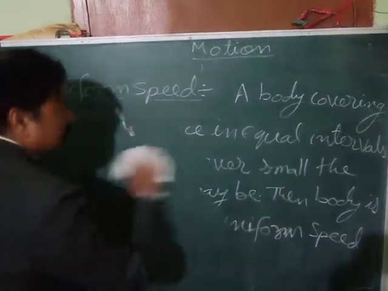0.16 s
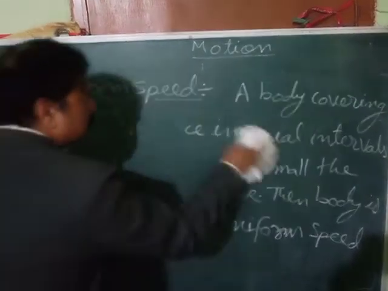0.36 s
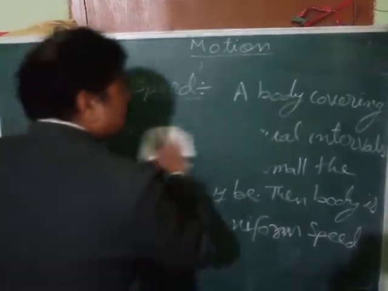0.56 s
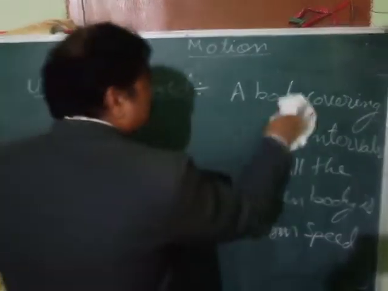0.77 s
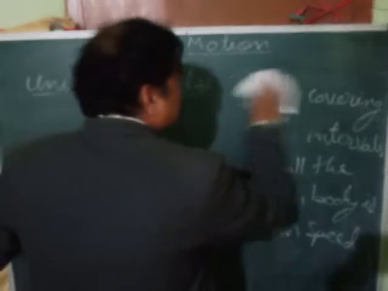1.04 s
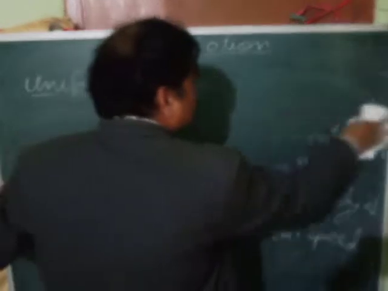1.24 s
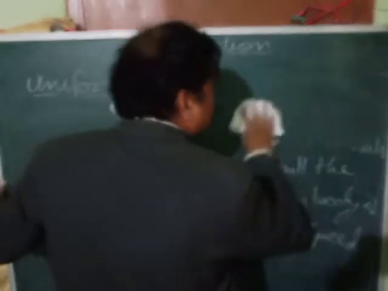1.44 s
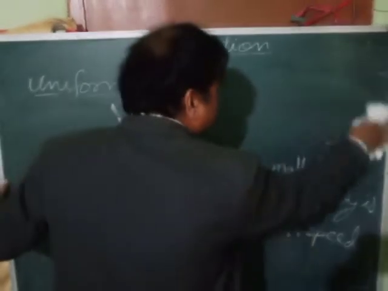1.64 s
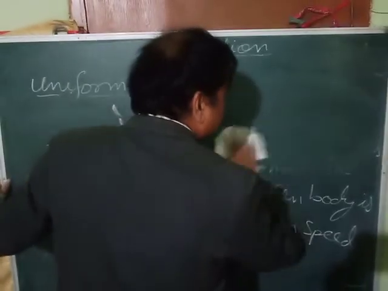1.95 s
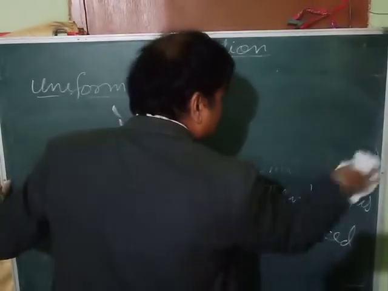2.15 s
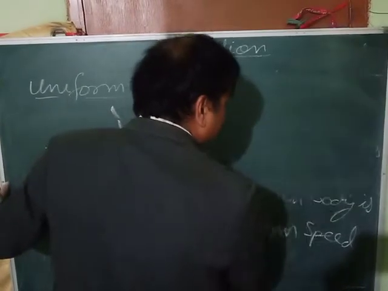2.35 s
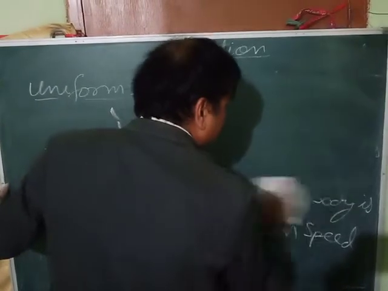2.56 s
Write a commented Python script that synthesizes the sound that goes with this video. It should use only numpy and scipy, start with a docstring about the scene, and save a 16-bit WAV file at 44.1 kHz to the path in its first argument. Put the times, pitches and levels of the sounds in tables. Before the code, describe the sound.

A cloth hisses over a chalkboard in quick alternating strokes from start to end, while the loose board knocks and rattles softly against the wall, strongest near one and two seconds; small quiet room, close microphone, nearly mono.

```python
"""A cloth hisses across a blackboard in quick back-and-forth strokes, wiping off chalk in a small classroom.
Fibres catch and slip: random clicks, coloured as hiss, fizz and rasp, grow with hand speed.
As the hand pushes off, the loose board often knocks on the wall, ringing its modes, and chatters briefly.
Low booms of the panel, scuffs of the bunched cloth, frame clatter, a short room tail and faint still air
fill in the rest. The sound is close to mono."""
import sys
import numpy as np
from scipy import signal
from scipy.fft import rfft, irfft
from scipy.io import wavfile
from scipy.ndimage import uniform_filter1d

SR = 44100
rng = np.random.default_rng(int(sys.argv[2]) if len(sys.argv) > 2 else 0)


def generate_wav(signal):
    """Clip the signal to [-1, 1] and save it as 16-bit WAV at the path in sys.argv[1]."""
    frames = np.transpose(np.atleast_2d(signal))
    scaled = np.clip(frames, -1, 1) * 32767
    pcm = np.round(scaled).astype(np.int16)
    wavfile.write(sys.argv[1], SR, pcm)


N = 119070

# fine treble of the rubbing cloth: freq_hz, gain_db
FIZZ_CURVE = [(7000, -51), (10000, 11), (12000, 5.5), (14000, 8.5), (15500, 3)]
# knocks of the board: start_s, level_db, contact_ms, chatter_db
BOARD_KNOCKS = [(0.255, -6.5, 3.06, -3), (0.358, -13.5, 5.1, -12), (0.574, -2.5, 1.64, -11),
                (0.963, -0.5, 0.95, -3), (1.164, -15, 4.9, -16.5), (1.930, 1, 1.0, -12.5),
                (2.305, -28.5, 2.6, 15), (2.402, 4, 0.78, -15)]


def undb(db):
    """Decibels to gain."""
    return 10 ** (np.asarray(db) / 20)


def unit(x):
    """Scale to an rms of 1."""
    return x / np.sqrt(np.mean(x ** 2))


def colour(x, points):
    """Filter by a (Hz, dB) curve, linear over log frequency; rms 1."""
    hz, db = np.array(points, float).T
    freq_hz = np.maximum(np.fft.rfftfreq(N, 1 / SR), 1)
    gain_db = np.interp(np.log(freq_hz), np.log(hz), db)
    return unit(irfft(rfft(x) * undb(gain_db), N))


def walk(rate_hz):
    """Slow random drift: held random steps, smoothed over one step; rms 1."""
    step = max(int(SR / rate_hz), 1)
    held = np.repeat(rng.standard_normal(N // step + 1), step)
    return unit(uniform_filter1d(held, step)[:N])


def catches():
    """Dense tiny clicks of fibres that catch and let go."""
    clicks_per_s, spread_db = 22000, -0.4
    hit = rng.random(N) < clicks_per_s / SR
    strength_db = spread_db * np.minimum(rng.exponential(size=N), 5)
    return hit * rng.standard_normal(N) * undb(strength_db)


def still_air():
    """Steady coloured noise of the quiet room."""
    level_db = -75.5
    # freq_hz, gain_db
    air_curve = [(25, -14), (45, -8.5), (75, -1), (120, 4.5), (200, -8), (400, -13), (1000, -11.5),
                 (4000, -30), (15000, -16.5)]
    return undb(level_db) * colour(rng.standard_normal(N), air_curve)


def side_noise():
    """Barely audible noise, opposite in left and right."""
    level_db = -81.5
    # freq_hz, gain_db
    noise_curve = [(25, -1), (120, 1.5), (300, 0.5), (1000, -1.5), (2500, -11), (5000, -27), (9000, -20.5),
                   (14000, -2.5)]
    return undb(level_db) * colour(rng.standard_normal(N), noise_curve)


def near_echo(rub, place, t):
    """One bounce off the arm and body; its lag follows the hand."""
    centre_ms, swing_ms, echo_db = 1.9, 1.16, -14
    lag_s = (centre_ms + swing_ms * (place - .5)) / 1000
    echo = undb(echo_db) * np.interp(t - lag_s, t, rub)
    return (rub + echo) / np.hypot(1, undb(echo_db))


def wiping(t):
    """Strokes speed up and slow down; rasp sounds even when slow, hiss and fine fizz when fast."""
    # strokes, right and left in turn: start_s, rise_s, fall_s, level_db, fizz_db, rasp_db
    strokes = [(-.12, 0.041, 0.12, -40.5, -9, 1.5), (0.038, 0.14, 0.12, -40, 0, -2.5),
               (.305, 0.1, 0.098, -40, -4, -4), (.515, 0.078, 0.15, -40, 1.5, 0),
               (.745, 0.073, 0.083, -45, -5, 5), (.92, 0.073, 0.22, -41.5, 0.5, 1.5),
               (1.215, 0.12, 0.079, -41, -1, 1.5), (1.409, 0.064, .165, -41.5, 0, 0),
               (1.67, 0.12, 0.13, -40, 0.5, 1.5), (1.905, 0.074, 0.16, -40, 1.5, -2),
               (2.123, 0.15, 0.11, -37, 1.5, -5.5), (2.376, 0.13, 0.18, -39, 1, -1.5)]
    # thinnings of the rasp: centre_s, half_width_s, gain_db
    rasp_dips = [(.912, .02, -12), (1.215, 0.092, -7), (1.655, 0.037, -16), (1.905, 0.022, -5)]
    # colours of the rub: freq_hz, gain_db
    hiss_curve = [(2000, -59), (2700, -21.5), (3400, -12), (4000, -5), (4500, -2.5), (5100, -6),
                  (5800, -6.5), (6800, 0.5), (7500, -4), (8500, -10), (9800, -10.5), (11200, -28.5),
                  (15500, -38)]
    rasp_curve = [(300, -35), (700, -26), (1450, -17), (1800, -6.5), (2600, 2.5), (3400, 0.5), (5000, -12)]
    hiss_power, fizz_power, rasp_power = 1.22, 1.6, 0.29  # growth with hand speed
    hiss_db, fizz_layer_db, rasp_layer_db = -0.5, -12, -13
    drag_db = -56.5  # the cloth never quite stops as the hand turns
    rasp_wobble_db, rasp_rate_hz = 2.06, 31
    grip_db, grip_rate_hz = .5, 110

    hiss, fizz, rasp, place = np.zeros((4, N))
    for k, (start, rise, fall, db, fizz_db, rasp_db) in enumerate(strokes):
        ramp = np.interp(t, [start, start + rise, start + rise + fall], [0, 1, 0])
        speed = np.sin(np.pi / 2 * ramp)
        hiss += undb(db) * speed ** hiss_power
        fizz += undb(db + fizz_db) * speed ** fizz_power
        rasp += undb(db + rasp_db) * speed ** rasp_power
        place += (-1) ** k * np.cumsum(speed) / (speed.sum() + 1e-9)  # 0 to 1 across the board
    rasp *= undb(sum(db * np.exp(-((t - at) / width) ** 2) for at, width, db in rasp_dips))

    rub = np.hypot(undb(hiss_db) * hiss, undb(drag_db)) * colour(catches(), hiss_curve)
    rub += undb(fizz_layer_db) * fizz * colour(catches(), FIZZ_CURVE)
    rasp_gain = undb(rasp_layer_db + rasp_wobble_db * walk(rasp_rate_hz))
    rub += rasp_gain * rasp * colour(catches(), rasp_curve)
    rub *= undb(grip_db * walk(grip_rate_hz))
    return near_echo(rub, place, t)


def booms(t):
    """A low note of the panel swells, sags in pitch and dies under the hand."""
    # sways of the panel: start_s, length_s, mid_pitch_hz, level_db
    sways = [(.0, .15, 126.4, -69.5), (.66, 0.12, 136, -64), (1.048, 0.056, 118, -54.5),
             (1.955, 0.054, 127, -56), (2.607, 0.098, 143, -47)]
    sag_hz_per_s = 220
    wobble_db, wobble_rate_hz = 4, 77  # wobble depth before smoothing
    out = np.zeros(N)
    for start, length, hz, db in sways:
        from_peak = t - start - length / 2
        cycles = hz * from_peak - sag_hz_per_s * from_peak ** 2 / 2
        swell = np.sin(np.pi * np.clip((t - start) / length, 0, 1))
        out += undb(db) * swell * np.sin(2 * np.pi * cycles)
    return out * undb(wobble_db * uniform_filter1d(walk(wobble_rate_hz), SR // 100))


def scuffs(t):
    """Short uneven rubs as the cloth bunches: a dull body and a crisp rustle."""
    # start_s, rise_s, decay_s, dull_db, crisp_db
    rubs = [(.255, .025, .035, -60, -78), (1.573, .006, .075, -55.5, -57), (1.724, .005, .025, -55, -68),
            (2.63, .03, .05, -64, -72)]
    # colour of the dull body: freq_hz, gain_db
    dull_curve = [(250, -16), (420, -2), (560, -16), (740, 3.5), (1020, 0.5), (1250, -3), (1750, 6.5),
                  (2300, -1.5), (3200, -20), (6800, -5.5), (9000, -28)]
    wobble_db, wobble_rate_hz = 0.6, 100
    dull, crisp = colour(catches(), dull_curve), colour(catches(), FIZZ_CURVE)
    out = np.zeros(N)
    for start, rise, decay, dull_db, crisp_db in rubs:
        attack = np.clip((t - start) / rise, 0, 1)
        release = np.exp(-np.maximum(t - start - rise, 0) / decay)
        out += attack * release * (undb(dull_db) * dull + undb(crisp_db) * crisp)
    return out * undb(wobble_db * walk(wobble_rate_hz))


def board_ring(age, modes):
    """Decaying modes of the board, a little different in level and pitch at each knock."""
    spread_db, detune, build_cycles = 1.03, 0.012, 0.84
    ring = np.zeros(len(age))
    for hz, mode_db, t60 in modes:
        level_draw, pitch_draw = rng.standard_normal(2)
        tone = np.sin(2 * np.pi * hz * (1 + detune * pitch_draw) * age)
        decay = np.exp(-np.log(1000) * age / t60)
        build = 1 - np.exp(-age * hz / build_cycles)
        ring += undb(mode_db + spread_db * level_draw) * tone * decay * build
    return ring


def knocks(t):
    """A soft blow, a rebound and a short chatter ring the board until the hand stills it."""
    # modes of the board: base_hz, base_level_db, t60_s
    modes = [(101, -17.5, 0.43), (156.4, -19.5, 0.62), (221, -26, 0.45), (275.3, 4, 0.11), (305, -6, 0.16),
             (399, -1, 0.12), (451, -15, 0.22), (521, -18, 0.09), (726, -15.5, 0.14), (877, -14, 0.071),
             (1076, -11, 0.06), (1125, -19.5, 0.047), (1400, -19, 0.26), (1815, -15, 0.36)]
    level_db = -38.5
    chatter_s, chatter_per_s = 0.17, 260
    rebound_s, rebound_db = 0.093, -14.5  # the board swings back and touches the wall again
    free_s, hand_damp_s = 0.12, 0.015  # free ringing, then the pressing hand
    out, age = np.zeros(N), t[:SR // 2]
    ms = np.arange(SR // 50) * 1000 / SR
    for start, db, contact_ms, chatter_db in BOARD_KNOCKS:
        chattering = (t > start) & (t < start + chatter_s)
        chatter = chattering * (rng.random(N) < chatter_per_s / SR) * rng.standard_normal(N)
        taps = undb(chatter_db) * chatter / (np.linalg.norm(chatter) + 1e-9)
        taps[int(start * SR)] += 1
        taps[int((start + rebound_s) * SR)] += undb(rebound_db)
        push = ms * np.exp(-2 * np.pi * ms / contact_ms)  # longer contact, duller blow
        blow = signal.fftconvolve(board_ring(age, modes), push / push.sum())
        stilled = np.exp(-np.maximum(t - start - free_s, 0) / hand_damp_s)
        out += undb(level_db + db) * stilled * signal.fftconvolve(taps, blow)[:N]
    return out


def clatter(t):
    """The frame rattles briefly with every knock: coloured clicks under a fast decay."""
    # freq_hz, gain_db
    rattle_curve = [(60, 9), (110, -8), (200, -6), (330, 7), (600, -0.5), (1200, -4.5), (2200, -5),
                    (4000, -23)]
    level_db, rise_s, decay_s = -50, 0.009, 0.04
    level = np.zeros(N)
    for start, db, _, _ in BOARD_KNOCKS:
        attack = np.clip((t - start) / rise_s, 0, 1)
        level += undb(db) * attack * np.exp(-np.abs(t - start) / decay_s)
    return undb(level_db) * level * colour(catches(), rattle_curve)


def low_cut(board):
    """The deep bass of the knocks is cut steeply below about 92 Hz."""
    return signal.sosfilt(signal.butter(6, 92, "high", fs=SR, output="sos"), board)


def room(x, wet_db):
    """Add the classroom's diffuse tail: decaying noise after a short gap."""
    t60_s, gap_s = 0.25, .014
    t = np.arange(SR // 2) / SR
    fade_in = np.clip(t / gap_s - 1, 0, 1)
    tail = rng.standard_normal(len(t)) * np.exp(-np.log(1000) * t / t60_s) * fade_in
    return x + undb(wet_db) * signal.fftconvolve(x, tail / np.linalg.norm(tail))[:N]


def scene():
    """Cloth and board in the room, with dry booms, over still air."""
    t = np.arange(N) / SR
    cloth = room(wiping(t) + scuffs(t), wet_db=-8)
    board = room(low_cut(knocks(t) + clatter(t)), wet_db=-7.5)
    mid = cloth + board + booms(t) + still_air()
    side = side_noise()
    return np.array([mid + side, mid - side])


def record(dry):
    """A steep elliptic low-pass cuts the top."""
    top_hz, ripple_db, stop_db = 15550, .1, 80
    return signal.sosfilt(signal.ellip(12, ripple_db, stop_db, top_hz, fs=SR, output="sos"), dry)


dry = scene()
out = record(dry)
generate_wav(out)
```